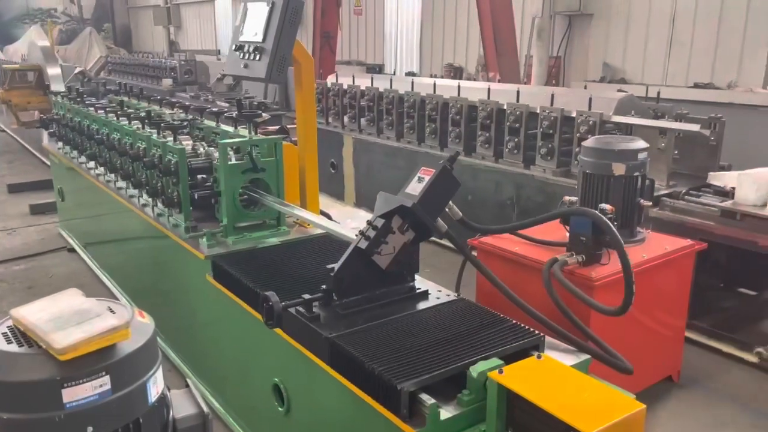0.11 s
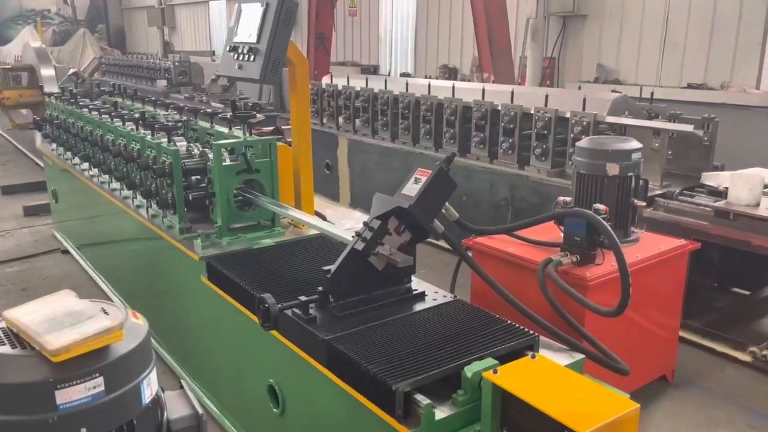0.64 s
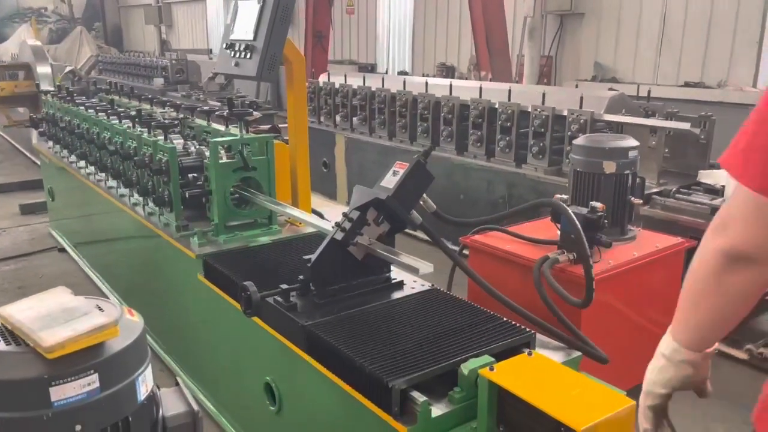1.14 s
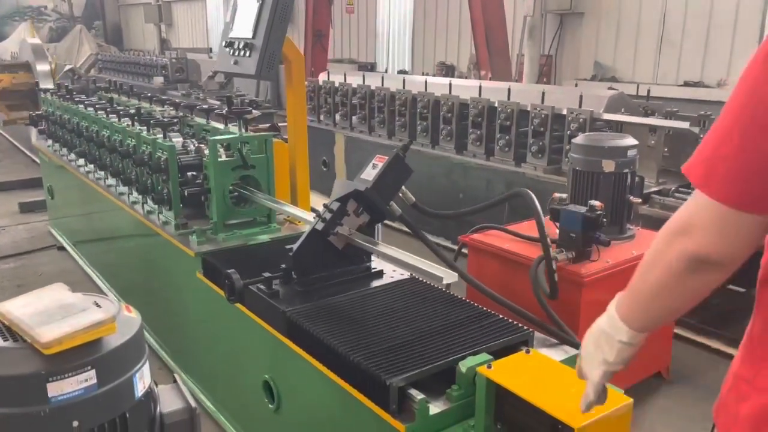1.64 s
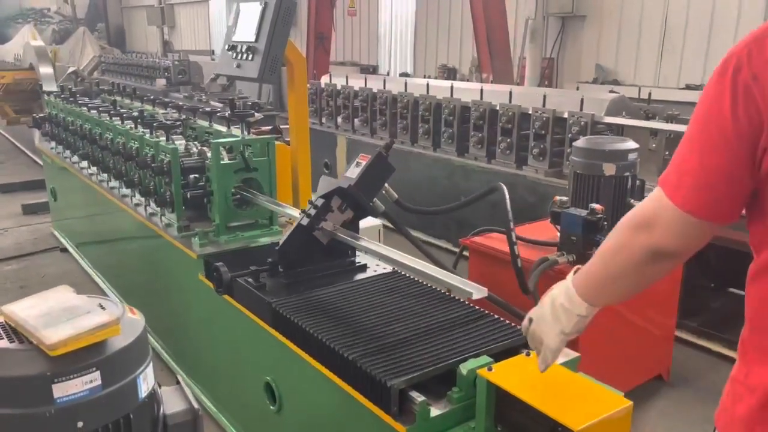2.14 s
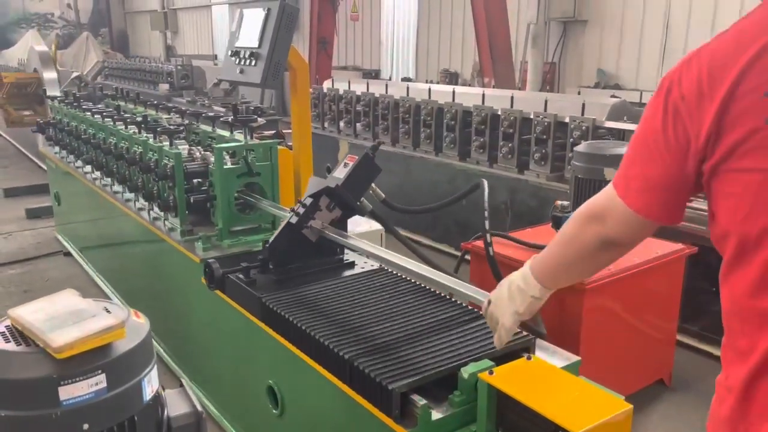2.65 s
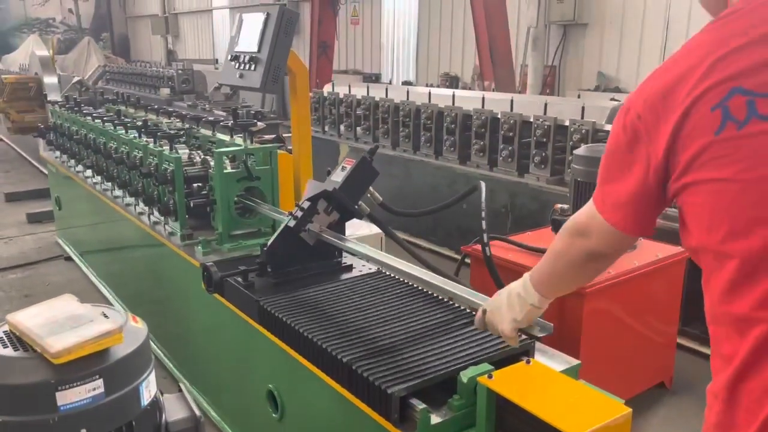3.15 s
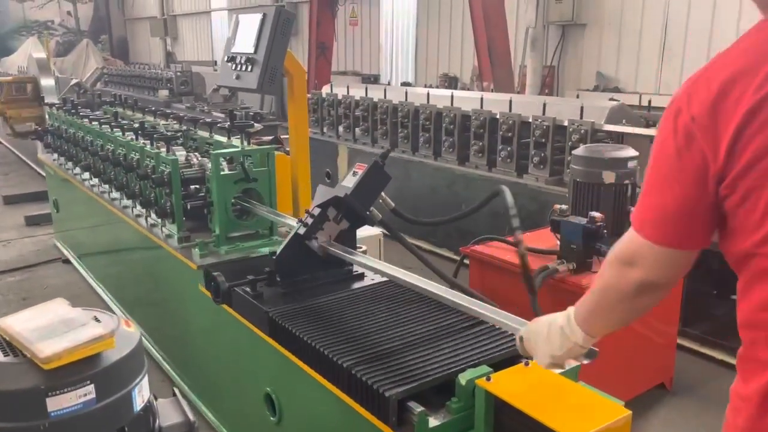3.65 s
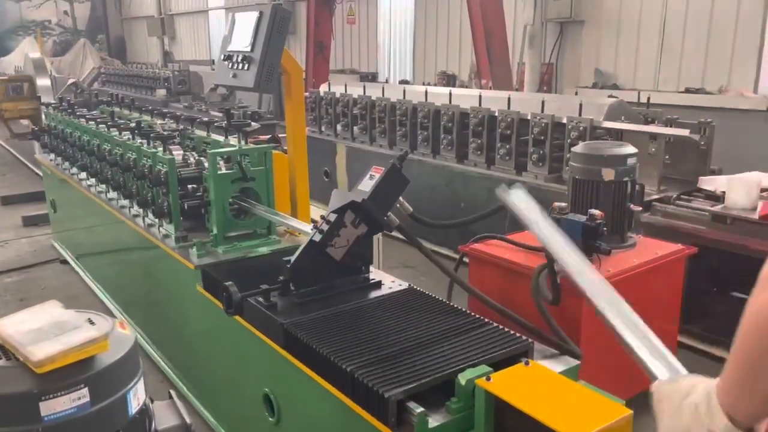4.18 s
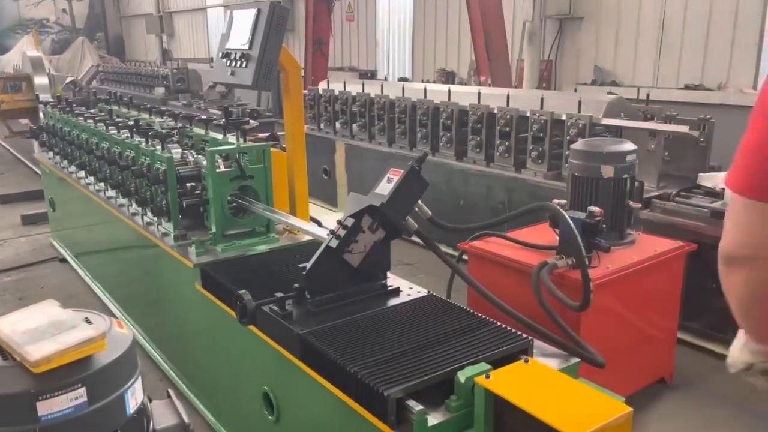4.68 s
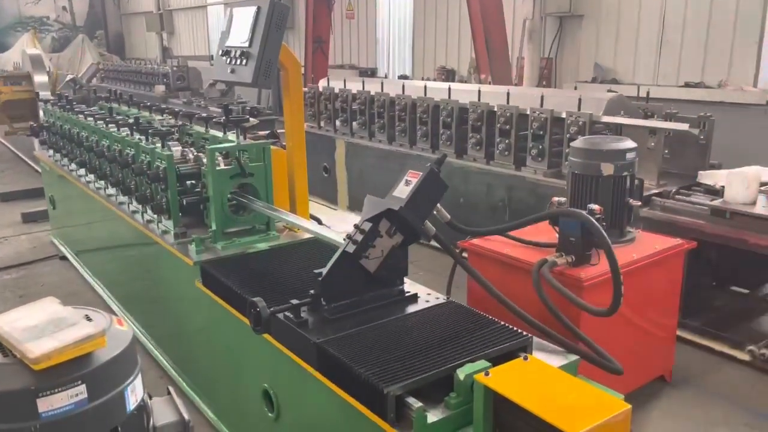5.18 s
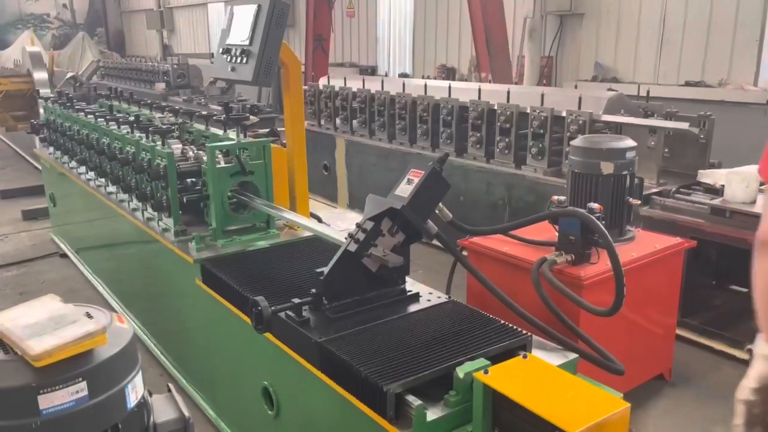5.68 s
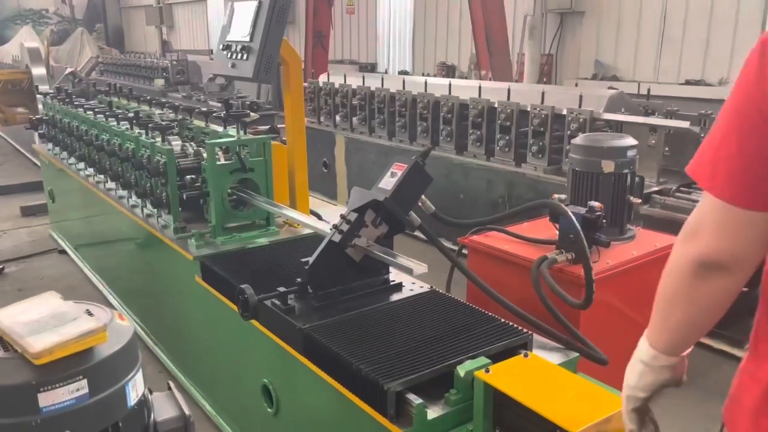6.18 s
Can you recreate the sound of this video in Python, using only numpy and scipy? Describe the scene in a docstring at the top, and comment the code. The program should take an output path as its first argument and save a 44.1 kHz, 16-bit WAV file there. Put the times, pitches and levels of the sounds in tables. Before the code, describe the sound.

A roll forming line runs throughout in a large, echoing steel hall: low motor rumble and hum, roller hiss, and a thin whine around 1 kHz pulsing quickly, all shifting slightly with load. A faint tick at 0.2 s precedes two hard, ringing steel clanks at 0.45-0.5 s, with loose rattles to 0.8 s. A far press thuds diffusely at 1.1, 1.75, 2.35 and 3.0 s, some strokes doubled, with a faint high tool ring. At 3.45-3.55 s the close shear cracks sharply in a rapid cluster, booming low, with further contacts at 3.7 s and a long hall tail. A weak press thud comes at 4.5 s. Bright double clanks strike at 5.4 s, followed by softer jostling and rattling until the end at about 6.3 s. The narrow phone microphone dips the background after loud hits, then lets it rise.

```python
"""A steel hall with a roll forming line: noise and drifting tones make its hum, hiss and pulsing whine.
Close by, loose steel clanks and rattles: bursts of noise ticks drive ringing resonances.
A far press thuds again and again, heard only as decaying hall noise, frame thud and high tool ring.
The shear, nearest of all, cuts strip with a crack and a boom: fading noise rings the die and the bed.
A phone microphone with a narrow band hears it; its gain sinks after loud sound and later recovers."""
import sys
import numpy as np
from scipy import signal
from scipy.fft import rfft, irfft, next_fast_len
from scipy.io import wavfile
from scipy.ndimage import uniform_filter1d, map_coordinates

SR = 44100
rng = np.random.default_rng(int(sys.argv[2]) if len(sys.argv) > 2 else 0)


def rack_gain(trim_db):
    """Turn a fader trim in dB into the linear factor to multiply a signal by."""
    fader = np.asarray(trim_db, float)
    return 10 ** (fader / 20)


def transcribe(u):
    """Save the signal u as a 16-bit wav file named by the first command-line argument.

    u: samples, shape (n,) or (channels, n), limited to [-1, 1]; the rate is SR.
    q: integer samples, one column per channel.
    """
    v = np.clip(np.atleast_2d(u).T, -1, 1)
    q = np.round(v * 32767).astype(np.int16)
    wavfile.write(sys.argv[1], SR, q)


N = 278271  # samples

# All levels are relative: each source and the microphone set them further.
# Drive rumble spectrum: [f/Hz, level/dB]
RUMBLE_SPECTRUM = [(15, -56), (25, -20.5), (85, -8), (160, -12), (204, -17), (306, -12), (395, -19),
                   (600, -21), (900, -19.5), (1170, -54), (1980, -120)]
# Rolls on strip and far fans, spectrum: [f/Hz, level/dB]
HISS_SPECTRUM = [(290, -30), (500, -14), (957, -17.5), (1040, -5.5), (1260, -12), (2940, -14),
                 (3470, -14.5), (4140, -14), (7830, -20), (8400, -30), (10900, -60.5), (18500, -120)]
# Motor tones: [f/Hz, level/dB, width/Hz]
MOTOR_TONES = [(51.4, -4.5, 5), (81, 3.5, 1.77), (96.3, -14.5, 7.8), (132.4, -7, 2.7), (159, -5.5, 3.4),
               (210.5, -12, 9.1), (303.5, -12.5, 4), (599.3, -11, 6.3)]
# Gear mesh and its shaft sidebands: [f/Hz, level/dB]
GEAR_MESH = [(1012, -1), (1028, 0), (1044, -9)]
# The drive labours and eases: [t/s, motor tones level/dB, gear whine level/dB]
DRIVE_LOAD = [(0, -32.5, -39), (.2, -35, -33.5), (.38, -27, -47), (.6, -35, -43), (1.101, -39, -44),
              (1.45, -34, -41), (1.7, -35, -42.5), (2.251, -30.5, -38.5), (2.399, -39, -45),
              (2.749, -38, -38), (3.102, -35.5, -51), (3.301, -38.5, -37.5), (3.751, -23, -40.5),
              (4.301, -39.5, -41), (4.45, -34, -43), (4.9, -35.5, -36), (5.25, -29, -39), (5.6, -40, -45),
              (6.31, -37, -45)]
# Steel pieces landing hard: [t/s, level/dB, rattle length/s, brightness/dB per octave, lowest ring level/dB]
STEEL_LANDINGS = [(0.456, -1, 0.036, -2.5, 8), (0.519, 5.5, 0.018, 2, 11), (5.391, 3, 0.043, 0.5, 10.5),
                  (5.448, 3.5, 0.025, 5, -12)]
# Loose pieces jostling: [t/s, level/dB, rattle length/s, brightness/dB per octave, lowest ring level/dB]
STEEL_JOSTLES = [(0.165, -25.5, 0.013, 3, -6), (0.55, 1, 0.047, 2, 0.5), (0.755, 1.5, .03, 3, -6),
                 (0.807, -4, 0.033, 1, -10), (5.49, -3, 0.02, 0, -12), (5.672, -4, 0.06, 3.5, 1),
                 (5.775, -5.5, 0.046, 3, -2), (5.855, -8.5, 0.052, 0.5, 2), (5.93, -10.5, 0.015, 3.5, 8),
                 (6.073, -8, 0.046, 1, 18), (6.165, -9, .02, -2, -17), (6.212, -7.5, 0.025, -2, -10.5),
                 (6.263, -13.5, .04, -4, 6)]
# Rings of the pieces, the upper ones retuned a little at each meeting: [f/Hz, width/Hz, level/dB]
STEEL_RINGS = [(771.6, 14.2, -4.5), (999.8, 12, -1.5), (1155.6, 20.4, 2.5), (1648, 17, -7),
               (1897, 4.1, -9.5), (2026, 20, -3.5), (2327, 70, -9), (2635, 53, -6), (2884, 22, -7),
               (3148, 57, -6.5), (3400, 15, -8), (3585, 62, -10.5), (3940, 45, -8), (4515, 49, -10),
               (5100, 53, -16.5), (5300, 16, -17.5), (5720, 36, -17.5), (5640, 110, -29), (7200, 12, -29.5),
               (6800, 42, -47.5), (7780, 82, -18)]
# Clatter between the rings, spectrum: [f/Hz, level/dB]
CLATTER_SPECTRUM = [(290, -59), (500, -17.5), (765, -24), (902, -8.5), (1140, 4.5), (1750, -10),
                    (3190, -10.5), (7730, -20), (8400, -16), (10900, -65.5), (18500, -120)]
# Dry steel snap, spectrum: [f/Hz, level/dB]
SNAP_SPECTRUM = [(240, -39.5), (400, -7.5), (617, -11.5), (1080, 1), (1970, -12.5), (3860, -4), (8400, -16),
                 (10900, -49.5), (18500, -120)]
# Far press, starting 8 ms before t: [t/s, level/dB, low thud level/dB, high ring level/dB,
# brightness/dB per octave]
PRESS_STROKES = [(1.139, -14.5, -5, -28.5, -0.5), (1.733, -14.5, -13, -15.5, 1.5),
                 (1.769, -17, -16.5, -16.5, 2), (2.339, -15.5, -6.5, -19, 1),
                 (2.369, -19.5, -5.5, -13.5, 0.5), (2.969, -18, -8, -18.5, 2.5), (4.51, -25.5, -6, -41, 5)]
# Press blow spectrum: [f/Hz, level/dB]
PRESS_SPECTRUM = [(59, -39.5), (100, -1), (384, 0), (428, -3), (695, -4.5), (862, -5.5), (1370, -3.5),
                  (2190, -10.5), (7300, -23.5), (9490, -58.5), (16100, -120)]
# Thud of the press frame: [f/Hz, width/Hz, level/dB]
PRESS_FRAME = [(134, 28, -12.5), (202, 37, 1.5), (260, 12, -11.5), (401, 49, -8)]
# High ring of the press tool: [f/Hz, level/dB, width/Hz]
PRESS_TOOL = [(7790, -4, 90), (7880, 0, 70)]
# Shear, starting 1 ms before t: [t/s, level/dB, crack t60/s, boom level/dB]
SHEAR_CONTACTS = [(3.4564, -7.5, 0.02, -12), (3.49, -11.5, 0.17, -2.5), (3.5196, 3.5, 0.15, -34),
                  (3.5408, -7, 0.046, -19.5), (3.6665, -10, 0.16, -9), (3.684, -6, 0.17, -17.5),
                  (3.7588, -16.5, 0.083, -11)]
# Resonances of blade and die: [f/Hz, width/Hz, level/dB]
SHEAR_DIE = [(1100, 290, -10), (1600, 120, 3), (2610, 300, 11.5), (4160, 330, 1.5), (4370, 230, -13.5),
             (7000, 840, -26.5)]
# Booms of the shear bed: [f/Hz, width/Hz, level/dB]
SHEAR_BED = [(55, 16, -11.5), (77, 19, -0.5), (146, 13, -10), (168, 27, -3.5), (207, 38, -6),
             (300, 88, -11), (616, 18, -13), (880, 80, -14)]
# Decay of the hall: [f/Hz, t60/s]
HALL_DECAY = [(100, 1.05), (1000, 1.37), (4000, 1.34), (8000, 1.23)]
# Microphone response: [f/Hz, level/dB]
MIC_RESPONSE = [(20, -25.5), (36, -1.5), (48, -1.5), (7950, -3.5), (8150, -7.5), (8400, -36.5),
                (8800, -57.5), (9300, -71), (12000, -75)]


def unit(x):
    """Scaled to rms 1."""
    return x / np.sqrt(np.mean(x ** 2) + 1e-20)


def along(points, hz):
    """Values between (f/Hz, value) points, read on a log axis."""
    f, value = np.transpose(points)
    return np.interp(np.log(hz + 1), np.log(f + 1), value)


def wobble(rate):
    """A smooth random curve, rate knots a second."""
    knots = rng.standard_normal(int(N * rate / SR) + 4)
    return map_coordinates(knots, [np.arange(N) * rate / SR])


def filtered(x, response):
    """x times a complex response of frequency."""
    m = next_fast_len(len(x) + SR // 4)
    hz = np.fft.rfftfreq(m, 1 / SR)
    return irfft(rfft(x, m) * response(hz), m)[:len(x)]


def coloured(spectrum, size):
    """Noise of rms 1 with a given spectrum."""
    return unit(filtered(rng.standard_normal(size), lambda hz: rack_gain(along(spectrum, hz))))


def resonant(x, peaks, scatter_db):
    """x through causal resonances of alternating sign, each at a new random strength."""
    gains = rack_gain(rng.normal(0, scatter_db, len(peaks)))

    def response(f):
        total = 0
        for k, (centre, width, db) in enumerate(peaks):
            damping = 1j * f * width
            total = total + (-1) ** k * gains[k] * rack_gain(db) * damping / (centre ** 2 - f ** 2 + damping)
        return total

    return filtered(x, response)


def tones(rows, size, steady):
    """Sines whose phase drifts more the wider they are, mixed with noise ringing at the same pitch."""
    t, total = np.arange(size) / SR, 0
    for hz, db, width in rows:
        drift = np.cumsum(rng.standard_normal(size)) * np.sqrt(width / SR)
        sine = np.sqrt(2) * np.sin(2 * np.pi * hz * t + drift)
        smear = unit(resonant(rng.standard_normal(size), [(hz, width, 0)], 0))
        total = total + rack_gain(db) * (steady * sine + (1 - steady) * smear)
    return total


def add(track, s, sound):
    """Mix a sound into the track at a time in seconds."""
    part = track[round(s * SR):][:len(sound)]
    part += sound[:len(part)]


def hall_answer():
    """One second of diffuse hall noise, each frequency dying at its own speed; energy 1."""
    hz, t, z = signal.stft(rng.standard_normal(SR), SR, nperseg=256)
    decay = rack_gain(-60 * t / along(HALL_DECAY, hz)[:, None])
    x = signal.istft(z * decay, SR, nperseg=256)[1][:SR]
    return x / np.linalg.norm(x)


def gear_whine():
    """Mesh tones one shaft rate apart drift together, so the whine pulses once a turn."""
    t = np.arange(N) / SR - .197  # sets where in the turn the pulse falls
    drift = np.cumsum(rng.standard_normal(N)) * np.sqrt(4 / SR)
    return sum(rack_gain(db + 5.3 * wobble(7)) * np.cos(2 * np.pi * hz * t + drift) for hz, db in GEAR_MESH)


def forming_line():
    """Rumble, motor tones and whine move with the drive's load; the hiss of the rolls flutters."""
    s, *columns = np.transpose(DRIVE_LOAD)
    motor_db, whine_db = [np.interp(np.arange(N) / SR, s, column) for column in columns]
    # the rumble takes a fifth of the motor's swing in dB
    rumble_db = -33 + 0.2 * (motor_db - motor_db.mean()) + 0.4 * wobble(6)
    rumble = rack_gain(rumble_db) * coloured(RUMBLE_SPECTRUM, N)
    hiss = rack_gain(-34 + 1.1 * wobble(9)) * coloured(HISS_SPECTRUM, N)
    whine = rack_gain(whine_db) * gear_whine()
    motor = rack_gain(motor_db + 1.7 * wobble(7)) * tones(MOTOR_TONES, N, steady=0.68)
    return rumble + hiss + whine + motor


def steel_clanks():
    """Each meeting is a blow and a short rattle of ticks that fades and rings the steel anew."""
    size = SR * 2 // 3
    out, t = np.zeros(N), np.arange(size) / SR
    # rise/s, dry crack level/dB, fade t60/s: loose pieces start more softly
    hard, loose = (.0006, -2.2, 0.18), (0.002, -12.5, 0.29)
    meetings = [(*row, *hard) for row in STEEL_LANDINGS] + [(*row, *loose) for row in STEEL_JOSTLES]
    for s, db, hold, bright_db, low_db, rise, crack_db, t60 in meetings:
        tick_gain = rack_gain(1.8 * rng.standard_normal(size // 100 + 1)).repeat(100)[:size]
        ticks = rng.standard_normal(size) * tick_gain
        after_rattle = np.maximum(t - hold, 0)
        fade = rack_gain(-60 * after_rattle / t60)
        onset = 1 - np.exp(-t / rise)
        blow = 1 + 2.0 * rack_gain(-60 * t / 0.015)  # the first contact is the hardest

        (hz, width, level), *upper = STEEL_RINGS
        tuning = 1 + .008 * rng.standard_normal(len(upper))  # no two pieces lie alike
        rings = [(hz, width, level + low_db)]
        rings += [(c * k, w, g) for k, (c, w, g) in zip(tuning, upper)]
        ring = resonant(ticks * fade * blow * onset, rings, scatter_db=2.5)
        ring /= np.sqrt(np.mean(ring[:SR // 20] ** 2))  # rms 1 over the first 50 ms

        clatter = 1.045 * fade * coloured(CLATTER_SPECTRUM, size)
        sound = filtered(ring + clatter, lambda f: rack_gain(bright_db * np.log2((f + 50) / 2000)))
        crack = rack_gain(crack_db - 60 * after_rattle / .03) * coloured(SNAP_SPECTRUM, size)
        add(out, s, rack_gain(db - 14) * onset * (sound + crack))
    return out


def far_press():
    """So far off that only the hall's answer arrives: it swells, then dies band by band."""
    out, t = np.zeros(N), np.arange(SR) / SR
    for s, db, thud_db, ring_db, bright_db in PRESS_STROKES:
        grit = rack_gain(2.8 * rng.standard_normal(SR // 150 + 1)).repeat(150)[:SR]  # separate reflections
        swell = (1 - np.exp(-t / 0.01)) * grit ** np.exp(-t / 0.072)  # the grit smooths out

        def colour(hz):
            return rack_gain(along(PRESS_SPECTRUM, hz) + bright_db * np.log2((hz + 50) / 1000))

        body = unit(filtered(hall_answer(), colour))
        thud = rack_gain(thud_db - 60 * t / 1.8) * unit(resonant(hall_answer(), PRESS_FRAME, scatter_db=4.5))
        ring = rack_gain(ring_db + 21.5 - 60 * t / 0.7) * tones(PRESS_TOOL, SR, steady=0.063)
        add(out, s - .008, rack_gain(db - 13.5) * swell * (body + thud + ring))
    return out


def shear():
    """Blade contacts crack in the die and set the bed booming."""
    out, t = np.zeros(N), np.arange(SR) / SR
    for s, db, t60, boom_db in SHEAR_CONTACTS:
        fade = rack_gain(-60 * t / t60) * (1 - np.exp(-t / (.015 * t60)))
        die = unit(resonant(rng.standard_normal(SR), SHEAR_DIE, scatter_db=1.0))
        crack = fade * (0.47 * die + coloured(SNAP_SPECTRUM, SR))
        push = rng.standard_normal(SR) * rack_gain(-60 * t / 1.25) * (1 - np.exp(-t / 0.014))
        boom = unit(resonant(push, SHEAR_BED, scatter_db=3.5))
        add(out, s - .001, rack_gain(db - 10) * (crack + rack_gain(boom_db - 2.0) * boom))
    return out


def gain_control(x):
    """The gain sinks while the output is over the ceiling, holds, then recovers."""
    ceiling_db, hold_s, recover_db_per_s = -17.5, 0.43, 46
    bite = .15  # share of the excess dB taken off per step
    step = SR // 200  # 5 ms
    step_s = step / SR
    # power over the latest six steps
    power = np.abs(uniform_filter1d(x ** 2, size=6 * step, origin=3 * step - 1))[::step]
    gain_db, wait, track = 0, 0, []
    for level_db in 10 * np.log10(power + 1e-12):
        over = level_db + gain_db - ceiling_db
        if over > 0:
            gain_db, wait = gain_db - bite * over, hold_s
        else:
            gain_db = min(0, gain_db + recover_db_per_s * np.clip(step_s - wait, 0, step_s))
            wait -= step_s
        track.append(gain_db)
    return x * rack_gain(np.interp(np.arange(N), np.arange(len(track)) * step, track))


def scene():
    """Near steel is mostly direct, with some hall; the shear stands nearest and sends less to it."""
    line, steel, press, cut = forming_line(), steel_clanks(), far_press(), shear()
    to_hall = np.pad(rack_gain(-4) * steel + rack_gain(-13) * cut, (700, 0))  # the hall answers 16 ms later
    echo = signal.fftconvolve(to_hall, hall_answer())[:N]
    return (steel + cut + echo + press + line)[None]


def low_pass(x):
    """Removes everything above the highest recorded frequency."""
    return signal.sosfilt(signal.butter(12, 9230, fs=SR, output="sos"), x)


def record(dry):
    """Narrow microphone band, gain control, then a soft ceiling on peaks."""
    heard = filtered(dry[0], lambda hz: rack_gain(along(MIC_RESPONSE, hz)))
    levelled = gain_control(heard)
    mix = levelled / (1 + np.abs(levelled / .95) ** 4) ** (1 / 4)
    return low_pass(mix[None])


dry = scene()
out = record(dry)
transcribe(out)
```